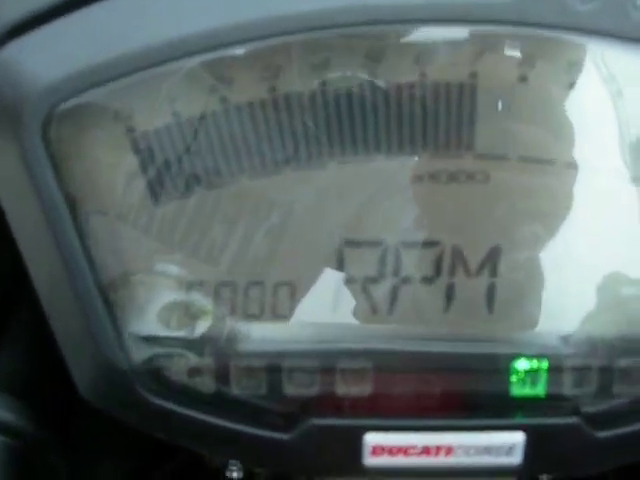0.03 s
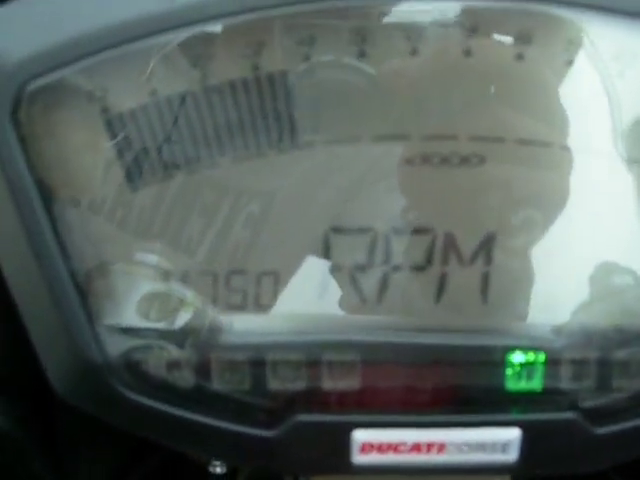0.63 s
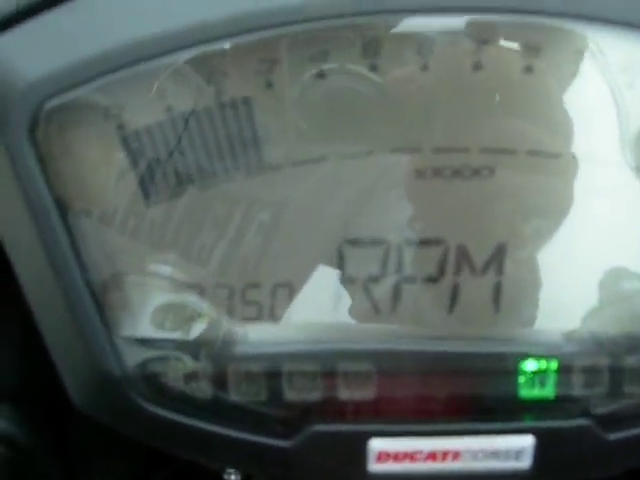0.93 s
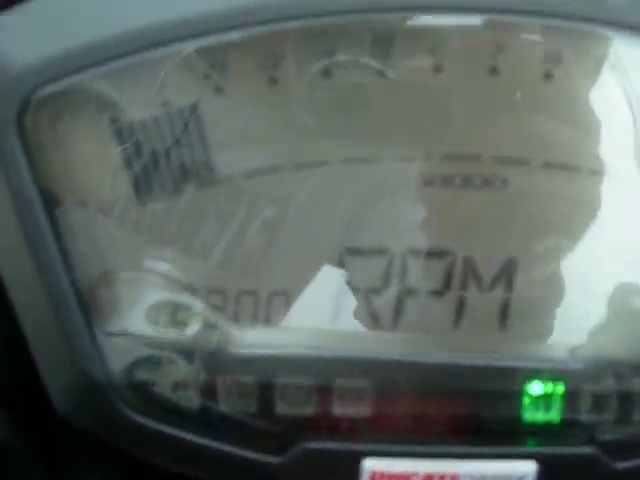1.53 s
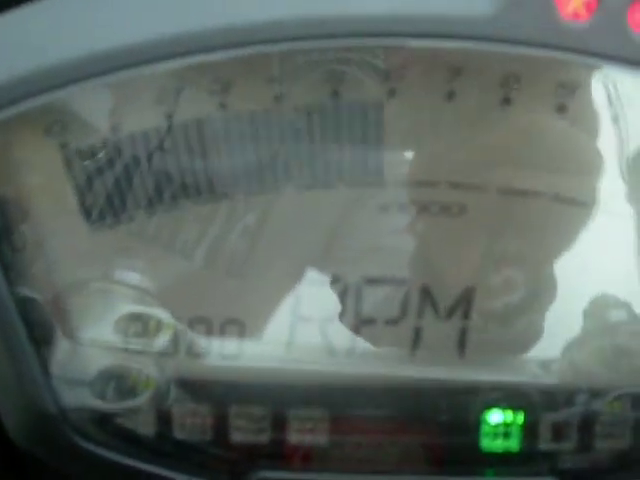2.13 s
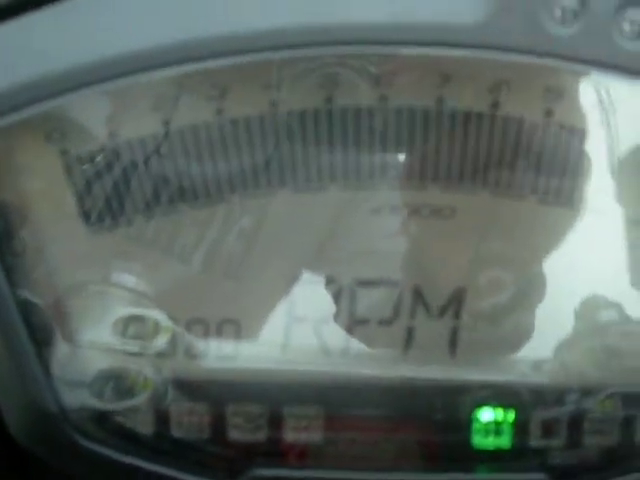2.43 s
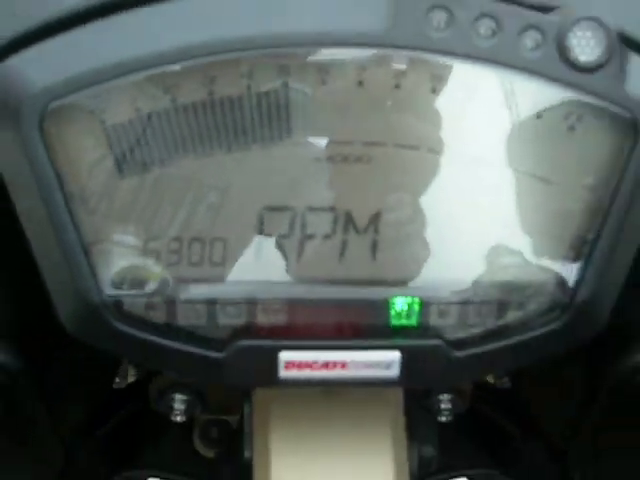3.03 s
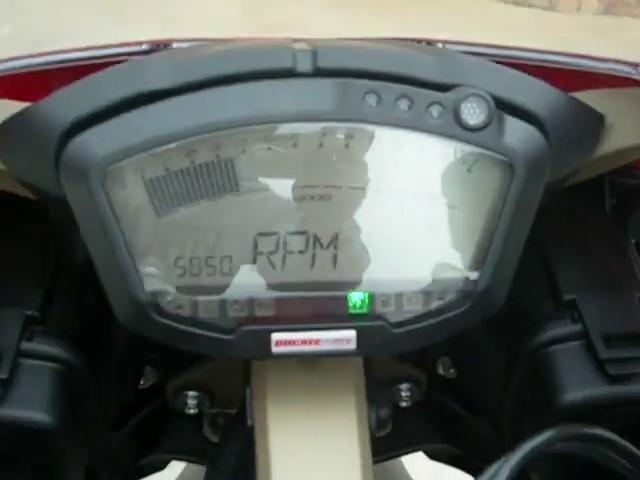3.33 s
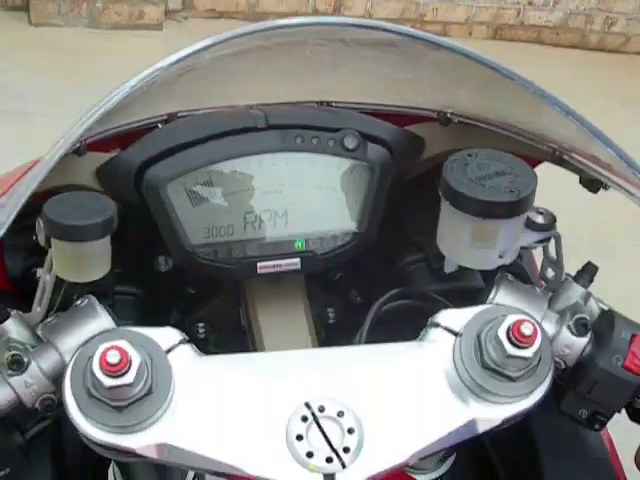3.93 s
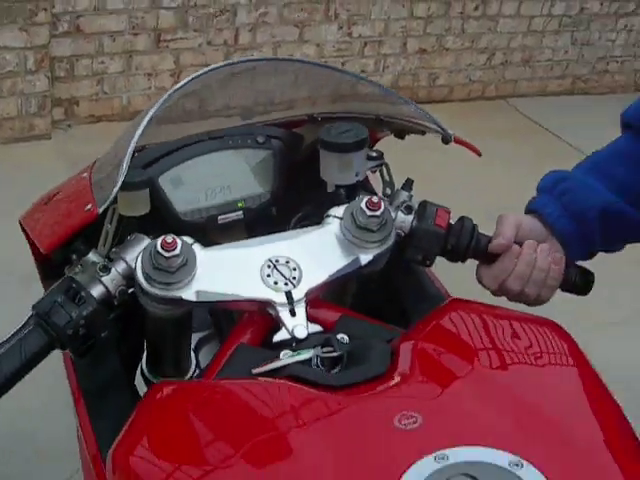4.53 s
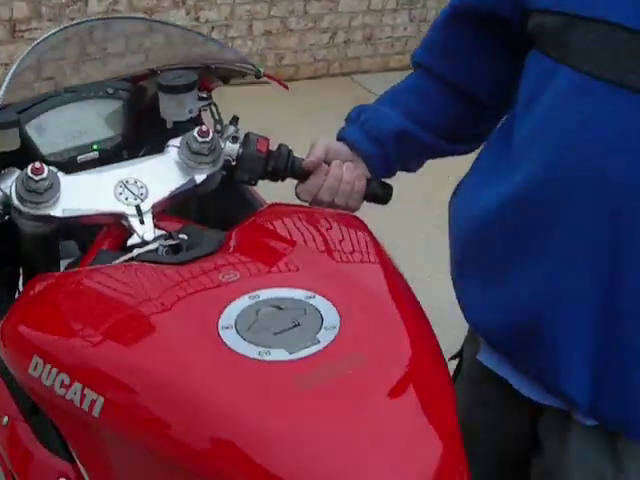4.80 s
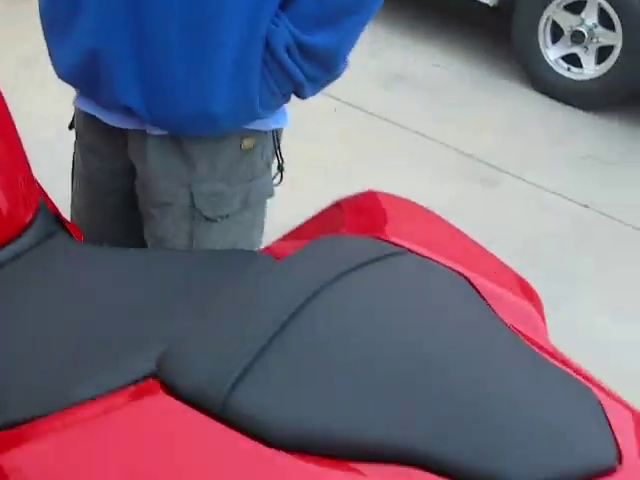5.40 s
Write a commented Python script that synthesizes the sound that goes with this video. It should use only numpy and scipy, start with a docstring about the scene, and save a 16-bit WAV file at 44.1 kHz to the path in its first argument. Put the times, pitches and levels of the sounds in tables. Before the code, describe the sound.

Heard up close outdoors, a standing motorcycle's engine falls in pitch and sputters down to a throbbing idle. The throttle is snapped open once, giving a loud, growling rev that slides back down into separate exhaust thumps. The bike then idles with a rough, uneven pulse over light valve clatter and gear whine, which soften as the microphone moves back above the tank.

```python
"""V-twin motorcycle revving and idling

A parked 90-degree V-twin with open pipes is heard from the dashboard, then from above the tank.
It runs down from a rev, stumbles into idle, is blipped hard once and settles to a lumpy idle again.
Slow firings excite the pipe resonances as separate thumps that echo off a wall; fast ones fuse into
a harmonic drone, over the rasp of turbulent gas, valve clatter, sharp engine knocks and gear whine."""
import sys
import numpy as np
from scipy import signal
from scipy.fft import rfft, irfft, next_fast_len
from scipy.io import wavfile
from scipy.ndimage import uniform_filter1d

SR = 44100
rng = np.random.default_rng(int(sys.argv[2]) if len(sys.argv) > 2 else 0)


def int16_out(signal):
    """Quantize to a 16-bit WAV file."""
    q = np.round(np.clip(np.atleast_2d(signal).T, -1, 1) * 32767)
    wavfile.write(sys.argv[1], SR, q.astype(np.int16))


N = 249606
TIME = np.arange(N) / SR
# `speed` is in four-stroke cycles per second; `crank` counts those cycles, each 720 degrees long
IDLE_CYCLES_PER_S = 13.1
SECOND_CYLINDER_PHASE = 270 / 720

# main resonance of the exhaust pipe: time_s, pitch_hz
PIPE_RESONANCE = [(0, 299.7), (.8, 297), (1.3, 273), (1.8, 294.7), (2.1, 340), (2.4, 337.6), (3.3, 268),
                  (3.7, 266), (4.1, 229.4), (5.6, 229.4)]
# the blip of the throttle: time_s, opening_share
THROTTLE_OPENING = [(1.81, 0), (1.89, 0.3), (2.0, 0.4), (2.14, 0.9), (2.2, 0.55), (2.31, 0.3), (2.37, 0)]
# the microphone is drawn back from under the windscreen: time_s, distance_share
MIC_RETREAT = [(2.65, 0.14), (3.25, 0.53), (3.55, 0.68), (3.85, 0.88), (5.66, 1.05)]
# spectrum of the rushing gas: frequency_hz, density_db
RASP_SPECTRUM = [(150, 4), (300, 14.5), (480, -2.5), (680, 3), (860, -3.5), (1050, -3), (1320, 1.5),
                 (1600, -0.5), (2000, -8.5), (2600, -16.5)]
# spectrum of the mechanical impacts: frequency_hz, density_db
CLATTER_SPECTRUM = [(1500, -0.5), (2100, 4.5), (2450, 0.5), (2750, 4.5), (2950, 1), (3200, 4), (3500, 0),
                    (3900, -1.5), (4200, -15)]


def from_db(db):
    """Convert decibels to an amplitude ratio."""
    return 10 ** (np.asarray(db) / 20)


def unit_rms(x):
    """Normalise a signal to unit mean power."""
    return x / np.sqrt(np.mean(x ** 2) + 1e-20)


def level_out(x):
    """Dividing by the running RMS holds the slow level at 1 and keeps the fast throb."""
    return x / np.sqrt(np.abs(uniform_filter1d(x * x, size=SR // 7)) + 1e-12)


def in_time(curve):
    """Interpolate a curve linearly at every sample."""
    return np.interp(TIME, *np.transpose(curve))


def db_at(spectrum, frequency):
    """Interpolate a spectrum on a logarithmic frequency axis."""
    frequencies, db = np.transpose(spectrum)
    return np.interp(np.log(frequency), np.log(frequencies), db)


def drift(rate_hz):
    """Random modulation of unit RMS, gliding to a new value `rate_hz` times a second."""
    return unit_rms(np.interp(TIME * rate_hz, np.arange(4096), rng.standard_normal(4096)))


def coloured(x, spectrum):
    """Spectral shaping to unit power, with a steep roll-off beyond both ends of the spectrum."""
    size = next_fast_len(N)
    hz = np.arange(1, size // 2 + 2) * SR / size
    roll_off = np.sqrt((1 + (spectrum[0][0] / hz) ** 8) * (1 + (hz / spectrum[-1][0]) ** 8))
    shaped = rfft(x, size) * from_db(db_at(spectrum, hz)) / roll_off
    return unit_rms(irfft(shaped, size)[:N])


def noise(spectrum):
    """Gaussian noise of unit power with the given spectrum."""
    return coloured(rng.standard_normal(N), spectrum)


def resonator(x, hz, width_hz, order):
    """Cascaded damped oscillators, steady or gliding; a unit impulse rings up to height 1."""
    pole = np.exp(-np.pi * width_hz / SR)
    carrier = np.exp(2j * np.pi * np.cumsum(hz + np.zeros(N)) / SR)
    baseband = x / carrier + 1e-18
    impulse_response = signal.unit_impulse(SR // 10)
    for _ in range(order):
        baseband = signal.lfilter([1], [1, -pole], baseband)
        impulse_response = signal.lfilter([1], [1, -pole], impulse_response)
    return -np.real(baseband * carrier) / impulse_response.max()


def decay(impulses, decay_s):
    """A leaky integrator: the envelope jumps at each impulse and dies exponentially."""
    return signal.lfilter([1], [1, -np.exp(-1 / (decay_s * SR))], impulses + 1e-18)


def cycle_gate(crank, phase, decay_cycles):
    """A periodic envelope that opens at one phase of the cycle and dies exponentially."""
    return np.exp(-((crank - phase) % 1) / decay_cycles)


def firings(crank, speed, firing_db, misfire_db=-10.5, same_stroke_s=.01):
    """Combustion as impulse trains: first cylinder, second cylinder and loud single firings."""
    # firings that fail to catch: time_s
    misfires = [0.865, 0.955, 0.973, 1.695, 3.358, 3.642, 3.785, 3.935, 4.005, 4.087, 4.465, 4.695, 4.922,
                5.074, 5.305, 5.535]
    # loud single firings that catch, each heard as a separate thump: start_s, level_db
    loud_firings = [(0.4177, -13), (0.446, -10.5), (0.468, -8.5), (0.504, -8), (0.5974, -5.5),
                    (0.654, -11.5), (0.716, -8.5), (0.737, -13.5), (0.792, -11.5), (0.8075, -9.5),
                    (0.826, -9), (0.902, -8.5), (0.925, -6), (1.0132, -8), (1.0345, -5), (1.071, -8),
                    (1.093, -6.5), (1.1384, -8.5), (1.1636, -8), (1.238, -5.5), (1.3632, -5.5),
                    (1.619, -8.5), (1.7714, -7.5), (1.819, -2), (1.842, -3.5), (1.8745, -12),
                    (1.8915, -4.5), (1.93, -4), (1.953, -9), (1.979, -5.5), (3.393, -10.5), (3.4344, -7.5),
                    (3.452, -10), (3.522, -6), (3.554, -10.5), (3.5885, -3), (3.618, -3), (3.689, -5),
                    (3.7231, -6), (3.803, -5), (3.842, -7), (3.905, -9.5)]
    scatter_db = np.interp(speed / IDLE_CYCLES_PER_S, [1, 2], [1.88, 4.5])  # more ragged above idle
    strength_db = firing_db + scatter_db * rng.standard_normal(N)
    impulses = np.zeros((3, N))
    for cylinder, (phase, cylinder_db) in enumerate([(0, 0), (SECOND_CYLINDER_PHASE, -2.5)]):
        strokes = np.flatnonzero(np.diff(np.floor(crank - phase)))
        impulses[cylinder, strokes] = from_db(strength_db[strokes] + cylinder_db)
    for time_s in misfires:
        impulses[:, np.abs(TIME - time_s) < same_stroke_s] *= from_db(misfire_db)
    for start_s, level_db in loud_firings:
        impulses[:, np.abs(TIME - start_s) < same_stroke_s] = 0  # replaces any regular firing there
        impulses[-1, round(start_s * SR)] = from_db(level_db)
    return impulses


def with_echoes(x):
    """Reflection from wall and ground adds delayed, weaker copies to the direct sound."""
    # reflections: delay_s, gain_db
    echoes = [(0.0158, -10), (0.0208, -11.6), (0.0277, -12.4), (0.0444, -15.8)]
    return x + sum(from_db(db) * np.interp(TIME - delay_s, TIME, x, left=0) for delay_s, db in echoes)


def thumps(first, second, loud, second_pitch_ratio=1.075, second_lag_s=.0037):
    """Impulse response of the pipe: each firing swells and dies in its damped resonances."""
    # main resonance for the first cylinder, the second cylinder and a loud firing: width_hz
    widths_hz = [116, 185, 145]
    # weaker pipe resonances: pitch_hz, width_hz, level_db
    pipe_modes = [(62, 35, -38.5), (112.4, 12, -36.5), (324.4, 15, -27.5), (482.7, 75, -22.5),
                  (820, 260, -23), (1350, 110, -45)]
    pipe_hz = in_time(PIPE_RESONANCE)
    second = np.pad(second, (round(second_lag_s * SR), 0))[:N]
    strikes = zip((first, second, loud), (1, second_pitch_ratio, 1), widths_hz)
    boom = sum(resonator(hits, pipe_hz * ratio, width_hz, order=4) for hits, ratio, width_hz in strikes)
    modes = sum(from_db(db) * resonator(first + second + loud, hz, width_hz, order=2)
                for hz, width_hz, db in pipe_modes)
    radiation = signal.butter(2, 45, "high", fs=SR, output="sos")  # an open pipe radiates no deep bass
    return with_echoes(signal.sosfilt(radiation, boom + modes))


def bark(impulses, turbulence=0.97):
    """A higher pipe resonance is excited by each firing and by the turbulent gas behind it."""
    gas = decay(impulses, decay_s=0.0053) * rng.standard_normal(N)
    excitation = unit_rms(impulses) + turbulence * unit_rms(gas)
    return level_out(with_echoes(resonator(excitation, hz=633.0, width_hz=79, order=2)))


def drone(crank, speed, roughness=0.16, jitter=0.022, pipe_lift_db=18, pipe_half_width_hz=31.8):
    """Source and filter: fast firings fuse into harmonics that slide through the pipe resonances."""
    # spectral envelope of the exhaust at speed: frequency_hz, level_db
    formants = [(110, -13), (160, -23.5), (200, -16.5), (235, -11.5), (270, -19), (350, -11.5),
                (410, -15.5), (480, -16), (580, -12), (680, -8.5), (800, -18), (950, -20.5), (1200, -16.5)]
    # harmonics of the cycle rate, higher ones as the last: harmonic_number, level_db
    harmonics = [(2, -21.5), (3, 2), (4, -1.5), (5, 2), (6, 1), (7, 1.5), (8, 5.5), (9, 2.5), (10, 0.5),
                 (11, 1.5), (12, 4), (13, -3)]
    pipe_hz = in_time(PIPE_RESONANCE)
    unrest = 1 + in_time(THROTTLE_OPENING)  # an open throttle deepens the phase jitter
    tone, power = 0, 0
    for k in np.arange(2, 17):
        lift_db = pipe_lift_db / (1 + ((k * speed - pipe_hz) / pipe_half_width_hz) ** 2)
        gain = from_db(db_at(formants, k * speed) + db_at(harmonics, k) + lift_db)
        angle = 2 * np.pi * (k * crank + rng.random()) + jitter * k * unrest * drift(70)
        tone += gain * (1 + roughness * drift(55)) * np.sin(angle)
        power += gain ** 2 / 2
    return tone / np.sqrt(uniform_filter1d(power, size=SR // 8))


def rasp(crank, flutter_db=1.3):
    """Turbulent flow noise, amplitude-modulated as gas rushes out with each exhaust stroke."""
    first_puff = 0.29 * cycle_gate(crank, phase=-0.0013, decay_cycles=0.02)
    second_puff = 0.3 * cycle_gate(crank, SECOND_CYLINDER_PHASE, decay_cycles=0.032)
    flow = 2.0 + first_puff + second_puff
    return level_out(noise(RASP_SPECTRUM) * flow * from_db(flutter_db * drift(70)))


def growl(crank, cycle_correlation=.8, points_per_cycle=256):
    """Quasi-periodic noise: each cycle's pressure ripple resembles the last, so overtones come and go."""
    # spectral envelope of the ripple: frequency_hz, gain_db
    ripple_spectrum = [(650, 8), (800, 1.5), (900, 0.5), (1050, 4), (1320, 7), (1600, 2.5), (2100, -6.5),
                       (2450, -4.5), (2800, -36.5), (3300, -29)]
    fresh = rng.standard_normal((int(crank[-1]) + 2, points_per_cycle))
    cycles = signal.lfilter([1], [1, -cycle_correlation], fresh, axis=0).ravel()
    ripple = np.interp(crank * points_per_cycle, np.arange(cycles.size), cycles)
    return level_out(coloured(ripple, ripple_spectrum))


def clatter(crank, scatter_db=2.3):
    """Impact noise: valves open and seat at set phases of the cycle, never twice equally hard."""
    # valve taps: phase_cycles, level_db
    valves = [(.8, 4), (0.96, 5), (0.3, 7.5)]
    taps = sum(cycle_gate(crank, phase, decay_cycles=.08) * from_db(db + scatter_db * drift(25))
               for phase, db in valves)
    return level_out(noise(CLATTER_SPECTRUM) * (1.9 + taps))


def knocks(impulses, light_db=-26.5, attack_s=.0006):
    """Sharp engine knocks as noise transients: a light tick at each firing, now and then a hard burst."""
    # hard knocks: start_s, level_db, decay_s
    hard_knocks = [(0.918, -15.5, 0.0044), (1.346, -14.5, 0.0057), (1.579, -12, 0.013),
                   (1.807, -14, 0.0087), (1.922, -28, 0.0046), (1.9844, -17.5, 0.0046),
                   (4.502, -21.5, 0.017), (4.585, -16.5, 0.0061), (4.734, -17.5, .008),
                   (4.816, -17.5, 0.0052), (5.4315, -22, 0.0038), (5.5056, -15, 0.0015), (5.584, -21, .004)]
    envelope = from_db(light_db) * decay(impulses, decay_s=0.015)
    for start_s, level_db, decay_s in hard_knocks:
        envelope += from_db(level_db) * decay(signal.unit_impulse(N, round(start_s * SR)), decay_s)
    envelope = decay(envelope, attack_s) / (attack_s * SR)  # rounds each onset
    knock_noise = from_db(-3.5) * noise(RASP_SPECTRUM) + from_db(-9) * noise(CLATTER_SPECTRUM)
    return signal.sosfilt(signal.butter(2, 450, "high", fs=SR, output="sos"), envelope * knock_noise)


def gear_whine(crank, speed, teeth_per_cycle=64.3, wander_hz=16, throttle_db=-40.5, retreat_db=-18.5):
    """Gear teeth sing through the case's resonances at the meshing frequency, dipping on compression."""
    # response of the gear case: frequency_hz, level_db
    gear_case = [(700, -47.5), (840, -26.5), (915, -22.5), (1050, -27), (1150, -32.5), (1350, -20),
                 (1430, -25.5), (1520, -20.5), (1650, -25), (1900, -26.5), (2100, -34.5), (2400, -49.5),
                 (3500, -68.5)]
    drive_phase, idle_dip, blur_db, flutter_db = .15, .25, -4, 1.5
    compression = ((1 - np.cos(2 * np.pi * (crank - drive_phase))) / 2) ** 3
    dip = idle_dip * (IDLE_CYCLES_PER_S / speed) ** 4  # the crank turns more evenly at speed
    mesh_hz = teeth_per_cycle * speed * (1 + dip * (compression.mean() - compression))
    tone = np.sin(2 * np.pi * np.cumsum(mesh_hz + wander_hz * drift(160)) / SR)
    blur = from_db(blur_db) * unit_rms(resonator(rng.standard_normal(N), mesh_hz, width_hz=90, order=2))
    flutter = from_db(flutter_db * drift(45))  # the teeth bear unevenly
    level_db = db_at(gear_case, mesh_hz) + throttle_db * in_time(THROTTLE_OPENING)
    level_db += retreat_db * in_time(MIC_RETREAT)
    return from_db(level_db) * unit_rms((tone + blur) * flutter)


def cam_belts(crank, speed, jitter_rad=0.25, db_per_doubling=67.5):
    """Periodic tooth contact on the cam belts gives two thin tones, heard only near top speed."""
    chord = sum(from_db(level_db) * np.sin(2 * np.pi * teeth_per_cycle * crank + jitter_rad * drift(120))
                for teeth_per_cycle, level_db in [(32, -28.5), (36, -24.5)])
    return from_db(db_per_doubling * np.log2(speed / speed.max())) * chord


def source_levels_db(speed):
    """Gains add in decibels: speed, throttle and microphone position set the level of five sources."""
    # on a closed throttle: speed_cycles_per_s, firing_db, drone_db, bark_db, rasp_db, clatter_db
    closed_levels = [(14.6, -6, -20, -34, -18, -30.5), (16, -13, -20, -34, -19.5, -31.5),
                     (21.7, -11.5, 0.5, -25.5, -16, -28), (28.6, -21, -20, -26, -20, -32),
                     (46.4, -16, -15.5, -25, -21, -32.5), (60.3, -25, -13.5, -14.5, -16.5, -27.5),
                     (99, -40.5, -5, -23.5, -16, -21)]
    # change of the same five sources at full throttle: gain_db
    throttle_gains = [13, 0.98, 20, 7.4, 0.36]
    # their change once the microphone is drawn back: gain_db
    retreat_gains = [1.64, -10.5, -14.5, -13, -6.5]
    throttle, retreat = in_time(THROTTLE_OPENING), in_time(MIC_RETREAT)
    speeds, *sources = np.transpose(closed_levels)
    return [np.interp(np.log(speed), np.log(speeds), closed_db) + throttle * open_db + retreat * far_db
            for closed_db, open_db, far_db in zip(sources, throttle_gains, retreat_gains)]


def scene(fuse_from_cycles_per_s=25.3, fuse_span_cycles_per_s=42):
    """Superposition of sources driven by one crank; with rising speed, thumps give way to a drone."""
    # engine speed, gliding exponentially between points: time_s, speed_cycles_per_s
    engine_speed = [(0.0, 54.48), (0.35, 36.24), (0.62, 26.6), (0.9, 19.6), (1.1, 15.8), (1.21, 13.12),
                    (1.55, 12.97), (1.81, 13.38), (1.93, 26.98), (2.0, 43.96), (2.06, 57.92), (2.15, 81.4),
                    (2.196, 86.0), (2.262, 89.0), (2.39, 76.5), (2.484, 69.0), (2.66, 55.5), (3.05, 36.85),
                    (3.55, 21.04), (3.85, 15.78), (4.02, 12.04), (4.24, 13.56), (4.5, 13.02), (4.85, 13.29),
                    (5.1, 12.98), (5.66, 13.13)]
    time_s, cycles_per_s = np.transpose(engine_speed)
    speed = np.exp(np.interp(TIME, time_s, np.log(cycles_per_s)))
    crank = .425 + np.cumsum(speed) / SR
    firing_db, drone_db, bark_db, rasp_db, clatter_db = source_levels_db(speed)
    fused = np.clip((speed - fuse_from_cycles_per_s) / fuse_span_cycles_per_s, 0, 1)
    first, second, loud = firings(crank, speed, firing_db)
    impulses = first + second + loud
    exhaust = thumps(first, second, loud)
    exhaust += from_db(bark_db) * np.sqrt(1 - .92 * fused) * bark(impulses)
    exhaust += from_db(drone_db) * np.sqrt(fused) * drone(crank, speed)
    # share of the gas noise that repeats each cycle; turbulence at open throttle lowers it
    periodic = 0.86 * fused * (1 - 0.22 * in_time(THROTTLE_OPENING))
    gas = from_db(rasp_db) * (np.sqrt(1 - periodic) * rasp(crank) + np.sqrt(periodic) * growl(crank))
    machinery = from_db(clatter_db) * clatter(crank) + knocks(impulses)
    machinery += gear_whine(crank, speed) + cam_belts(crank, speed)
    return (exhaust + gas + machinery)[None]


def record(dry, gain_db=0.78, ceiling=0.74, hardness=16, band_hz=4200, overload=.72, cutoff_hz=15900):
    """Saturation in a narrow-band microphone channel rounds the peaks; overshoots flatten and crackle."""
    driven = dry * from_db(gain_db)
    rounded = driven / (1 + np.abs(driven / ceiling) ** hardness) ** (1 / hardness)
    narrow = signal.sosfilt(signal.ellip(10, .3, 80, band_hz, fs=SR, output="sos"), rounded)
    flattened = np.clip(narrow, -overload, overload)
    return signal.sosfilt(signal.cheby2(12, 70, cutoff_hz, fs=SR, output="sos"), flattened)


dry = scene()
out = record(dry)
int16_out(out)
```